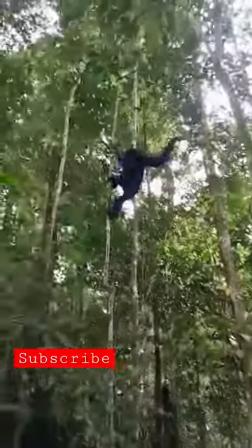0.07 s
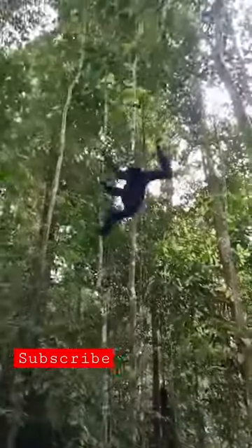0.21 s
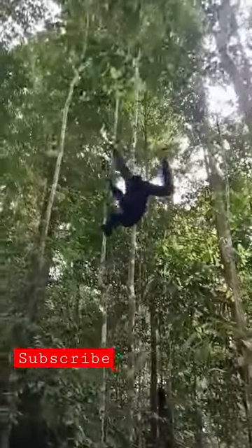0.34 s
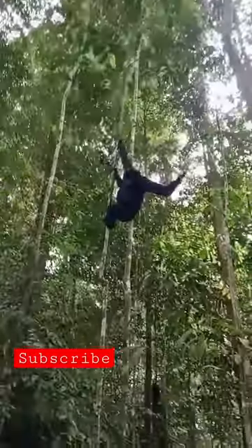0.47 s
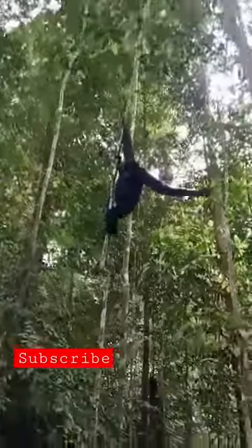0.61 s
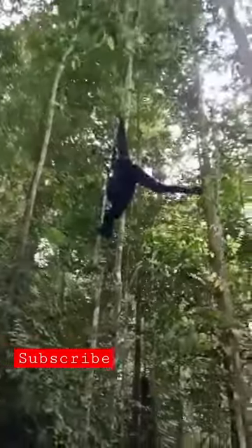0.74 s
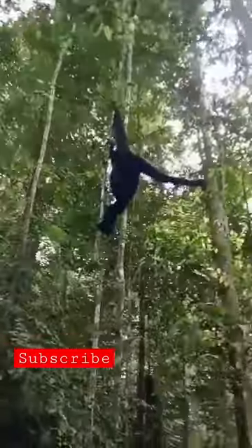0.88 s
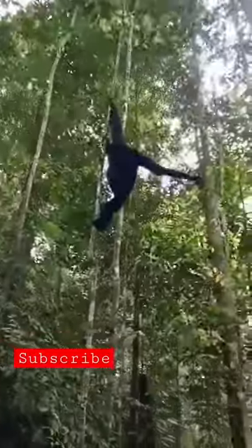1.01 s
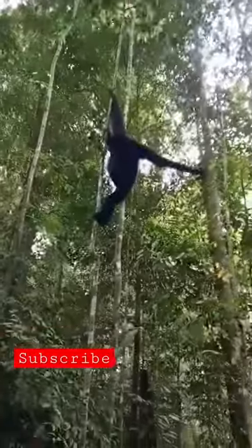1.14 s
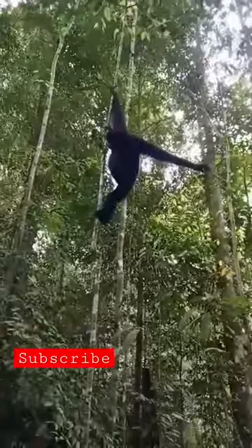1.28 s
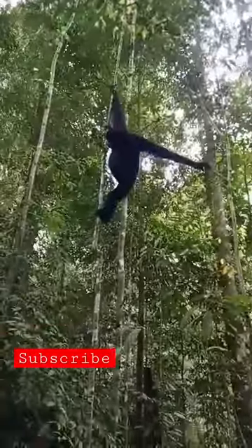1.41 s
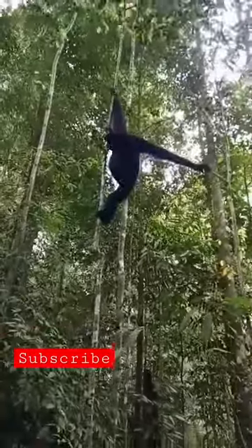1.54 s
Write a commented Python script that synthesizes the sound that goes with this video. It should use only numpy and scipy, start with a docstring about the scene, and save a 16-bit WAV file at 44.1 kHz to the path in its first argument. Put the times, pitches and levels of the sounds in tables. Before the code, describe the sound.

Branches rustle close by in a forest, softly at first with faint clicks and low knocks around 0.1-0.25 s. Rustling jumps near 0.4 s and surges at 0.7-0.9 s with a dense cluster of sharp twig snaps. A lower buzz enters about 0.9 s; a hard hollow knock lands at 1.13 s. Leaves then fade by 1.6 s, while cicadas buzz steadily and crickets whistle briefly over soft distant foliage.

```python
"""Close by in a forest by day, branches bend: leaves rustle in waves (short scrapes over hiss), twigs snap
(clicks and splinters ringing damped modes) and a few hollow stems knock (fading tones, the low ones rumbling).
Behind them cicadas buzz near 4 kHz (click trains in resonances) and crickets whistle in phrases (near sines).
A lower buzz of resonant noise comes and goes over a soft wash of far foliage (coloured, flickering noise).
One small microphone hears it all."""
import sys
import numpy as np
from scipy import signal
from scipy.fft import rfft, irfft
from scipy.io import wavfile
from scipy.ndimage import uniform_filter1d

SR = 44100
rng = np.random.default_rng(int(sys.argv[2]) if len(sys.argv) > 2 else 0)


def file_out(sig):
    """Save sig as 16-bit WAV at sys.argv[1]."""
    # one column per channel
    cols = np.atleast_2d(sig).T
    # limit, then scale
    lim = np.clip(cols, -1, 1)
    pcm = np.round(lim * 32767).astype(np.int16)
    wavfile.write(sys.argv[1], SR, pcm)


def convert_level_to_amplitude(level_db):
    """Map a level in decibels to its linear amplitude factor."""
    exponent = np.asarray(level_db, float) / 20
    return 10 ** exponent


N = 70560
T = np.arange(N) / SR  # s
BIN_HZ = np.arange(N // 2 + 1) * SR / N  # pitch of each spectrum bin
TREBLE_HZ = 5000  # leaves and twigs set their treble apart above this


def level(x, db):
    """Scale to an rms level."""
    return x * convert_level_to_amplitude(db) / np.sqrt(np.mean(x ** 2))


def curve(rows, column):
    """One column of a table, joined by straight lines in time."""
    return np.interp(T, [r[0] for r in rows], [r[column] for r in rows])


def colour(x, points):
    """Filter a sound by a gain curve of (Hz, dB) points, straight over log frequency."""
    point_hz, point_db = np.transpose(points)
    gain_db = np.interp(np.log(np.maximum(BIN_HZ, 1)), np.log(point_hz), point_db)
    return irfft(rfft(x) * convert_level_to_amplitude(gain_db), N)


def ring(x, hz, t60):
    """One damped mode, struck by x; it fades 60 dB in t60 seconds."""
    pole = np.exp(2j * np.pi * hz / SR - np.log(1000) / (t60 * SR))
    return signal.lfilter([1], [1, -pole], x).imag


def walk(rate):
    """Random levels held 1 / rate s and slewed twice; spread near 1."""
    hold = int(SR / rate)
    steps = np.repeat(rng.standard_normal(N // hold + 1), hold)
    return 1.3 * uniform_filter1d(uniform_filter1d(steps, hold), hold)[:N]


def patchy(x, per_octave, db, rate):
    """Overlapping bands of a sound, each flickering alone."""
    spectrum, out = rfft(x), 0
    place = per_octave * np.log2(np.maximum(BIN_HZ, 1))
    for centre in range(4 * per_octave, 16 * per_octave):
        band = irfft(spectrum * np.clip(1 - abs(place - centre), 0, 1), N)
        out = out + band * convert_level_to_amplitude(db * walk(rate))
    return out


def leaves():
    """Dense short scrapes over hiss; level and brightness follow the bending."""
    # Waves of rustling. Each row: time in seconds, level in dB before the treble gain, treble gain in dB.
    rustle = [(0, -51, -2.5), (.11, -48.5, 0), (.38, -47.5, 3.5), (.42, -39.5, 1), (.56, -46, 8),
              (.68, -42.5, 1.5), (.77, -39.5, 2), (.81, -35, -1), (.9, -35, 5), (1.0, -47, 4.5),
              (1.055, -44.5, 10), (1.09, -58.5, 5), (1.13, -40.5, 3.5), (1.2, -50, 3), (1.35, -45, -2.5),
              (1.6, -58, 6.5)]
    # Relative colour of the leaf noise as the small microphone picks it up.
    # Each row: frequency in Hz, density in dB per Hz.
    leaf_colour = [(50, -13.5), (200, -4), (800, 0.5), (1350, 2.5), (2050, -0.5), (2710, -1.5),
                   (3700, -1.5), (5200, -13.5), (8400, -17), (9600, -28), (10600, -47), (11500, -40),
                   (15500, -55)]
    grains_per_s, grain_decay_s = 1200, .0015
    scatter_db = 4  # grain strength varies upward, to twice this
    hiss_db = 0  # against the scrapes
    flicker_db, flicker_per_s = 3.5, 25

    strength = convert_level_to_amplitude(scatter_db * np.minimum(rng.exponential(size=N), 2))
    hits = (rng.random(N) < grains_per_s / SR) * strength
    envelope = signal.lfilter([1], [1, -np.exp(-1 / (grain_decay_s * SR))], hits)
    scrape = level(envelope * rng.standard_normal(N), 0)
    hiss = level(rng.standard_normal(N), hiss_db)
    rustling = level(colour(scrape + hiss, leaf_colour), 0)
    treble = irfft(rfft(rustling) * (BIN_HZ > TREBLE_HZ), N)
    body = rustling - treble
    treble = patchy(treble, 4, flicker_db, flicker_per_s) * convert_level_to_amplitude(curve(rustle, column=2))
    return (body + treble) * convert_level_to_amplitude(curve(rustle, column=1))


def twigs():
    """Each snap is a click plus fading splinters; it favours the modes near its pitch."""
    # What twigs ring with. Each row: mode frequency in Hz, mode strength in dB.
    modes = [(820, 0), (1340, 0.5), (1840, -2), (2300, -1), (2750, 3.5), (3450, 1), (4350, 2), (5600, -7),
             (7300, -2.5), (8300, 2.5), (9300, -1.5), (11500, -11.5)]
    # Snaps. Each row: start in seconds, strength in dB, favoured pitch in Hz,
    # gain of the crack above 5 kHz in dB, splinter fade by 60 dB in seconds.
    snaps = [(0.0979, -34.5, 2340, -26, 0.12), (0.2416, -29.5, 2850, -15, 0.11),
             (0.5679, -27.5, 1870, -32, 0.026), (0.572, -33.5, 1320, -2, 0.08),
             (0.591, -32.5, 1900, -26, 0.09), (0.7079, -18, 2960, -15.5, 0.041),
             (0.7878, -20, 1760, -14.5, 0.051), (0.8372, -23.5, 2720, -11, 0.049),
             (0.8444, -15.5, 2030, 3, 0.032), (0.8706, -15, 1750, -4.5, 0.096),
             (0.8733, -22, 2700, -30, 0.049), (1.13, -34, 2720, -11, 0.42), (1.209, -38.5, 2550, 3.5, 0.1),
             (1.335, -34, 1780, -30, .06)]
    favour_octaves = 0.92  # a mode this far from the favoured pitch is 6 dB weaker
    splinters_per_s, splinter_db, treble_splinter_db = 2000, -12, -2.5  # treble dB comes on top
    fade_cycles = 27  # of a mode, to fade 60 dB
    low_hz, top_hz = 480, 11500  # band in which the snaps are heard: thin twigs give little bass, and the treble rolls off

    out, t = np.zeros(N + SR), T[:SR // 4]
    shape = (len(snaps), len(t))
    splinters = rng.standard_normal(shape) * (rng.random(shape) < splinters_per_s / SR)
    for (start, db, pitch_hz, crack_db, tail_s), noise in zip(snaps, splinters):
        force = convert_level_to_amplitude(splinter_db) * noise * convert_level_to_amplitude(-60 * t / tail_s)
        treble_force = force * convert_level_to_amplitude(treble_splinter_db)
        force[0] = treble_force[0] = 1  # the click
        for k, (hz, mode_db) in enumerate(modes):
            if hz > TREBLE_HZ:
                push, near_db = treble_force, crack_db
            else:
                push, near_db = force, -6 * (np.log2(hz / pitch_hz) / favour_octaves) ** 2
            gain = (-1) ** k * convert_level_to_amplitude(db + mode_db + near_db)  # neighbouring modes in opposite phase
            out[int(start * SR):][:len(t)] += gain * ring(push, hz, fade_cycles / hz)
    band = signal.butter(5, [low_hz, top_hz], "band", fs=SR, output="sos")
    return signal.sosfilt(band, out[:N])


def stems():
    """Knocks on hollow stems, soft or hard: ringing modes, more of a rumble the lower they are."""
    # Each row is one mode, and rows starting together make one knock.
    # Each row: start in seconds, level in dB, pitch in Hz, fade by 60 dB in seconds.
    knock_modes = [(0.169, -32.5, 342.3, 0.25), (0.233, -32.5, 408, 0.088), (.236, -33.5, 733, 0.05),
                   (.572, -27, 519, 0.064), (0.696, -31.5, 645, 0.11), (0.92, -32.5, 219, 0.15),
                   (0.942, -36.5, 108.3, 0.15), (0.931, -31, 442, 0.071), (1.133, -20.5, 1374, 0.11),
                   (1.1338, -13.5, 1594, 0.022), (1.134, -26, 857, 0.03)]
    attack_cycles, rattle_cycles = .9, 7  # time constant of the onset; 60 dB fade of the rattle's resonance
    clean_hz = 300  # well below this pitch a mode is mostly rumble

    out = 0
    for start, db, hz, t60 in knock_modes:
        t = np.maximum(T - start, 0)
        rumble_share = np.exp(-(hz / clean_hz) ** 2)
        rattle_t60 = rattle_cycles / hz
        rattle = level(ring(ring(rng.standard_normal(N), hz, rattle_t60), hz, rattle_t60), 0)
        tone = np.sin(2 * np.pi * hz * t)
        envelope = convert_level_to_amplitude(db - 60 * t / t60) * (1 - np.exp(-t * hz / attack_cycles))
        out = out + envelope * ((1 - rumble_share) * tone + rumble_share * rattle)
    return out


def cicadas(count=6):
    """A few singers: uneven tymbal clicks ring a body resonance, each at its own pitch and rate."""
    # Swell of the chorus. Each row: time in seconds, level in dB.
    chorus = [(0, -50), (.35, -45.5), (.55, -50), (1, -45.5), (1.6, -45)]
    middle_hz, spread_hz, bandwidth_hz = 4316, 40, 209  # spread is from singer to singer
    clicks_per_s = 130  # of the middle singer; the click spacing shifts by 8 % of this one's per singer
    jitter, scatter_db = 0.071, 3  # of the click spacing, as a fraction, and of the click strength

    t60, out = np.log(1000) / (np.pi * bandwidth_hz), 0
    for k in range(count):
        timing, strength = rng.standard_normal((400, 2)).T
        spacing = SR / clicks_per_s * (1 + .08 * (k - count / 2))  # samples
        at = np.cumsum(spacing * np.clip(1 + jitter * timing, .2, 2)).astype(int) + rng.integers(300)
        inside = at < N
        clicks = np.zeros(N)
        clicks[at[inside]] = convert_level_to_amplitude(scatter_db * strength[inside])
        clicks = clicks * convert_level_to_amplitude(2 * walk(12))  # each singer's level wanders
        hz = middle_hz + spread_hz * (k - (count - 1) / 2)
        out = out + ring(ring(clicks, hz, t60), hz, t60)
    return level(out, 0) * convert_level_to_amplitude(curve(chorus, column=1))


def crickets():
    """Near sines in soft-edged phrases; pitch and level waver."""
    # Phrases, near and far. Each row: start in seconds, length in seconds, pitch in Hz, peak level in dB,
    # the last two being what the wavering moves around.
    phrases = [(0, 1.6, 6800, -71), (.108, .22, 6830, -58.5), (.655, .075, 6820, -61),
               (1.078, .115, 6800, -54), (1.215, .085, 6790, -57.5), (1.48, .05, 6770, -61),
               (1.02, .36, 9220, -75)]
    edge_s, waver_db, waver_pitch = .012, 3, .003  # pitch waver as a fraction

    out = 0
    for start, length, hz, db in phrases:
        gate = np.clip(np.minimum(T - start, start + length - T) / edge_s, 0, 1)
        loudness = convert_level_to_amplitude(db + waver_db * walk(70))
        phase = 2 * np.pi * np.cumsum(hz * (1 + waver_pitch * walk(60))) / SR
        out = out + gate * loudness * np.sin(phase)
    return out


def low_buzz():
    """A lower buzz, likely a second insect: fluttering noise in one resonance."""
    # Rise and fall of the buzz. Each row: time in seconds, level in dB.
    swell = [(.88, -58), (.93, -40.5), (1.08, -43.5), (1.11, -46.5), (1.33, -47), (1.6, -60.5)]
    hz, t60 = 2720, 0.0037  # Hz, s
    flutter = rng.standard_normal(N) * convert_level_to_amplitude(3.0 * walk(90.0))
    return level(ring(ring(flutter, hz, t60), hz, t60), 0) * convert_level_to_amplitude(curve(swell, column=1))


def wash():
    """Far foliage and air: coloured noise, flickering octave by octave."""
    # Relative colour of the far foliage. Each row: frequency in Hz, density in dB per Hz.
    wash_colour = [(30, -56), (65, -4), (220, -5.5), (900, -5.5), (1350, 3), (2700, -7), (4000, -16.5),
                   (5000, -40), (9000, -62.5), (15500, -68)]
    flicker_db, flicker_per_s = 2.5, 12.32
    noise = colour(rng.standard_normal(N), wash_colour)
    return level(patchy(noise, 1, flicker_db, flicker_per_s), -49.5)


def scene():
    """All sources at one point."""
    near = leaves() + twigs() + stems()
    insects = cicadas() + crickets() + low_buzz()
    return (near + insects + wash())[None]


def band_limit(x):
    """A steep low-pass at the top of the band."""
    return signal.sosfilt(signal.butter(12, 15620, fs=SR, output="sos"), x)


def record(dry):
    """The small microphone drops the deep bass, below 63 Hz."""
    bass_cut = signal.butter(2, 63, "high", fs=SR, output="sos")
    mix = signal.sosfilt(bass_cut, dry)
    return band_limit(mix)


dry = scene()
out = record(dry)
file_out(out)
```